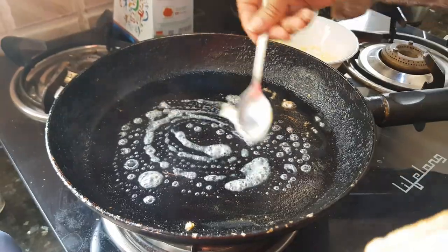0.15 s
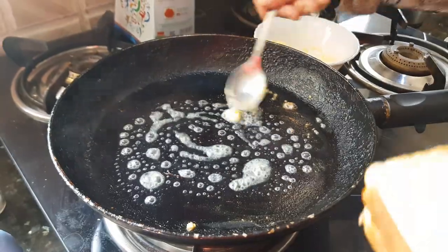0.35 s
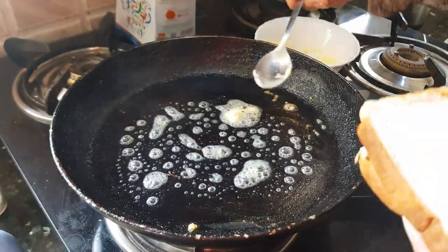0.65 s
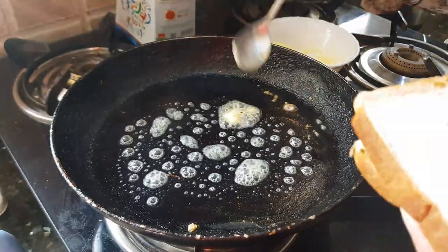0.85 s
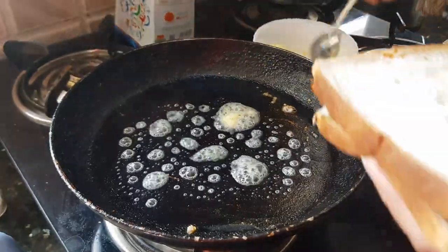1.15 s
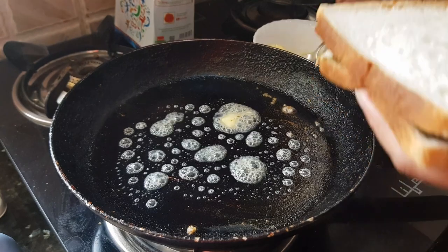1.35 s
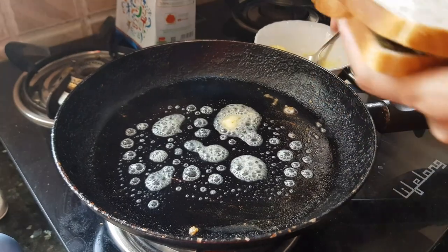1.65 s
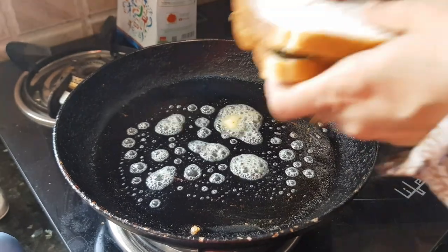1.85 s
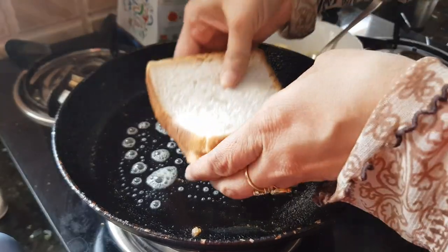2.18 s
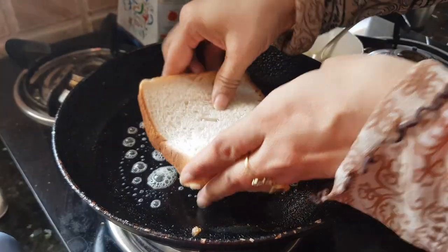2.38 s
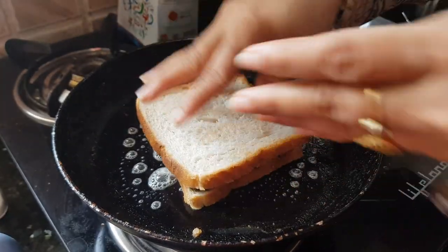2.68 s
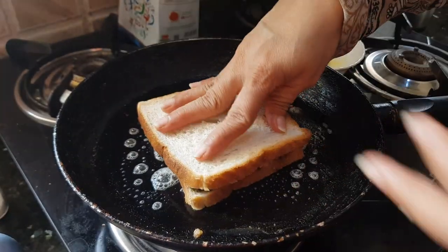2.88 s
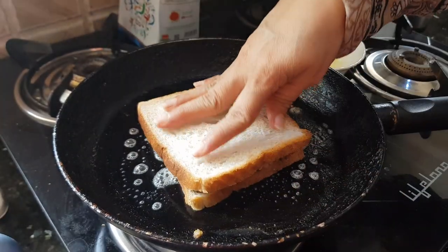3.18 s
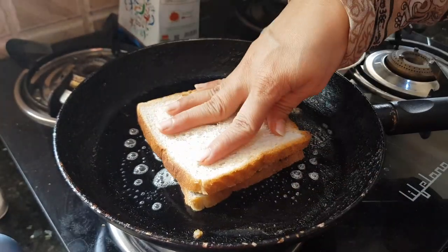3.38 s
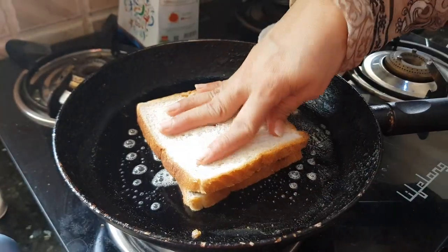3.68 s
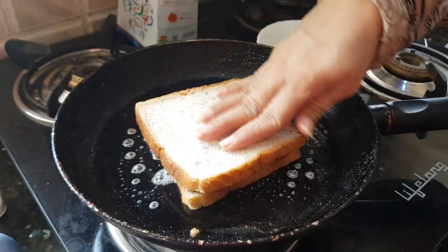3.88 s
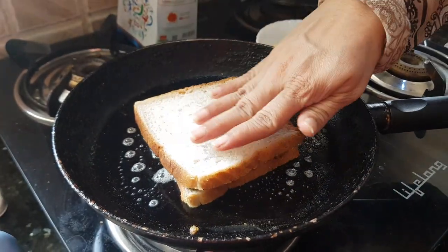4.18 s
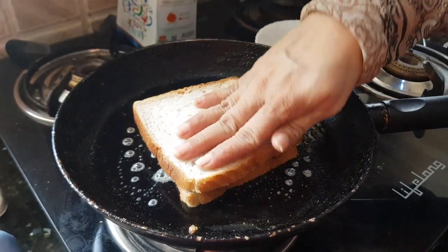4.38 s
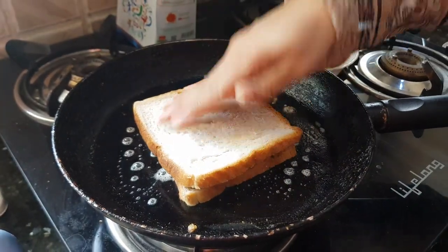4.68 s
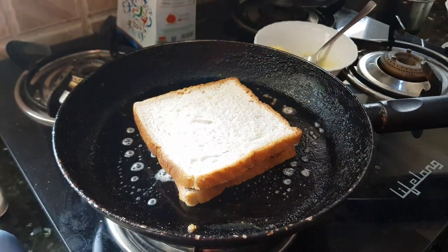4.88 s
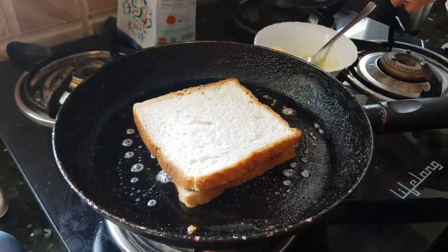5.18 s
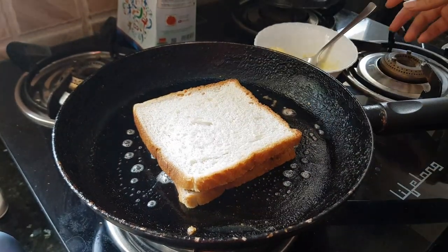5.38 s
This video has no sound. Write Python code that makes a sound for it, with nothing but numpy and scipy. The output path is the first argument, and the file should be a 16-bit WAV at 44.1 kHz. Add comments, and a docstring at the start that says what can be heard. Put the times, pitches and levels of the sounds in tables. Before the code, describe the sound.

A short spoon scrape, lively hot butter sizzle, a ringing spoon drop, then the sizzle drops away under a sandwich, over a low motor hum.

```python
"""A kitchen, at the stove, heard by two microphones with the left one nearer the pan.
Low room noise and a motor's hum lie behind; these are drifting noise and a few wavering harmonics.
A spoon scrapes the pan (clicks into damped modes), thumps, and is dropped into a bowl (ringing modes).
In front, butter sizzles and pops as showers of short rising bursts; a sandwich laid on it muffles the fizz."""
import sys
import numpy as np
from scipy import signal
from scipy.fft import rfft, irfft
from scipy.io import wavfile
from scipy.ndimage import uniform_filter1d

SR = 44100
rng = np.random.default_rng(int(sys.argv[2]) if len(sys.argv) > 2 else 0)


def inscribe(sig):
    """Save sig as 16-bit PCM at rate SR to the path in sys.argv[1].

    A 1-D sig is mono; a 2-D sig holds one channel per row.
    Samples are clipped to [-1, 1] before scaling.
    """
    pcm = np.round(np.clip(np.atleast_2d(sig).T, -1, 1) * 32767)
    wavfile.write(sys.argv[1], SR, pcm.astype(np.int16))


N = 244314
LEAD = 6  # samples by which the left microphone hears the stove first
# midpoint and time scale of a slow shift in pan, pop knock and the background's middle band, after the fizz is
# muffled
SHIFT_S, SHIFT_SPAN_S = 3.8, 0.53


def gain_of(db):
    """Decibels to gain."""
    return 10 ** (np.asarray(db) / 20)


def evened(x):
    """Scales to rms 1."""
    return x / np.sqrt(np.mean(x ** 2) + 1e-20)


def read(points, hz):
    """Reads a spectrum table on a log-frequency axis."""
    f, value = np.transpose(points)
    return np.interp(np.log(hz + 1), np.log(f + 1), value)


def curves(rows):
    """Each column of a time table, sample by sample."""
    s, *columns = np.transpose(rows)
    return [np.interp(np.arange(N) / SR, s, c) for c in columns]


def sides(pan_db):
    """Left and right gain for a level difference; positive leans left."""
    return np.array([gain_of(pan_db / 2), gain_of(-pan_db / 2)])


def add(mix, s, sound):
    """Mixes a two-channel sound in at a time."""
    part = mix[:, round(s * SR):][:, :sound.shape[1]]
    part += sound[:, :part.shape[1]]


def colour(x, spectrum):
    """Flattens each channel's long-term spectrum and imposes the given one."""
    z = rfft(x)
    own = np.sqrt(uniform_filter1d(abs(z) ** 2, size=151) + 1e-12)
    wanted = gain_of(read(spectrum, np.fft.rfftfreq(N, 1 / SR)))
    return evened(irfft(z / own * wanted, N))


def burst(hz, cycles):
    """One bubble: a few cycles that start softly and rise in pitch as it collapses."""
    u = np.arange(256) / SR * hz / cycles
    return u * np.exp(1 - 3 * u) * np.sin(2 * np.pi * cycles * u * (1 + 0.056 * u))


def room(x, t60, wet_db):
    """Pan walls and tiles: a short decaying noise tail, another for each side."""
    t = np.arange(SR // 4) / SR
    tail = rng.standard_normal((2, len(t))) * gain_of(-60 * t / t60) * (t > .002)
    tail = tail / np.linalg.norm(tail[0])
    return x + gain_of(wet_db) * signal.fftconvolve(x, tail, axes=1)[:, :N]


def shifted(s):
    """How far the slow shift has gone, 0 to 1."""
    return .5 + .5 * np.tanh((s - SHIFT_S) / SHIFT_SPAN_S)


# colour of the kitchen's low noise, with its resonances: (f/Hz, relative level/dB per Hz)
RUMBLE = [(35, -12), (60, -5.5), (77, -10.5), (102, -2), (120, -10.5), (143, -5.5), (170, -14.5),
          (203, -10), (235, -22.5), (269, -12.5), (300, -17), (335, -17.5), (417, -23), (735, -24.5),
          (796, -30), (988, -23), (1160, -36), (1500, -26.5), (1950, -45), (3300, -120)]
# likeness of the two microphones: (f/Hz, left-right correlation from 0 to 1)
SAME = [(60, 0.69), (240, 0.67), (950, 0.11), (3770, 0.01), (15000, 0.02)]
RUMBLE_DB, PATCH_DB = -55, 1.2  # level before panning; depth of the drifting patches
# above about 400 Hz the background is quieter and patchier early: level change and extra patch depth, fading
# out around SHIFT_S
EARLY_MID_DB, EARLY_PATCH_DB = -4, 5


def rumble():
    """Low room noise in drifting patches of time and frequency, most alike on both sides in the bass."""
    a, b = rfft(rng.standard_normal((2, N)))
    same = np.clip(read(SAME, np.fft.rfftfreq(N, 1 / SR)), -1, 1)
    pair = irfft([a, same * a + np.sqrt(1 - same ** 2) * b], N)
    z = signal.stft(colour(pair, RUMBLE), nperseg=2048)[2]
    patches = uniform_filter1d(rng.standard_normal(z.shape[1:]), size=3, axis=0)
    patches = uniform_filter1d(patches, size=3, axis=1)
    hz = np.arange(z.shape[1])[:, None] * SR / 2048
    s = np.arange(z.shape[2]) * 1024 / SR
    early = (1 - shifted(s)) * read([(220, 0.035), (420, 1.0)], hz)
    patch_db = (PATCH_DB + EARLY_PATCH_DB * early) * evened(patches)
    patchy = signal.istft(z * gain_of(patch_db + EARLY_MID_DB * early), nperseg=2048)[1][:, :N]
    return gain_of(RUMBLE_DB) * evened(patchy) * sides(1.2)[:, None]


# the motor's hum, before its waver and harmonic balance: (t/s, level/dB)
HUM = [(0.0, -44.5), (1.16, -44), (1.27, -47.5), (1.71, -46.5), (3.44, -46.5), (3.93, -43.5), (5.54, -43.5)]
# harmonics of the motor: (multiple of the hum pitch, level/dB relative to the hum)
HUM_ORDERS = [(1, -2.5), (2, -21), (3, -26), (4, -44), (5, -30)]
HUM_HZ, HUM_DRIFT_HZ, HUM_WAVER_DB = 53.15, 0.26, -0.14  # mean pitch, rms drift, scale of level waver


def hum():
    """Motor orders at multiples of one turning rate; speed and level waver slowly."""
    drift, waver = [evened(uniform_filter1d(v, size=6000)) for v in rng.standard_normal((2, N))]
    turns = np.cumsum(HUM_HZ + HUM_DRIFT_HZ * drift) / SR
    tone = sum(gain_of(db) * np.sin(2 * np.pi * (k * turns + rng.random())) for k, db in HUM_ORDERS)
    level_db = curves(HUM)[0] + HUM_WAVER_DB * uniform_filter1d(waver, size=1500)
    return np.sqrt(2) * gain_of(level_db) * tone * sides(2.8)[:, None]


THUMP_S, THUMP_HZ, THUMP_DB, THUMP_CYCLES = .238, 138, -45, 8.5


def thump():
    """A soft low thump as the spoon leaves the pan: a few cycles that swell and die."""
    u = np.arange(0, 1, THUMP_HZ / THUMP_CYCLES / SR)  # 0 to 1 over the whole thump
    wave = np.sin(np.pi * u ** 0.58) ** 2 * np.sin(2 * np.pi * THUMP_CYCLES * u)
    out = np.zeros((2, N))
    add(out, THUMP_S, gain_of(THUMP_DB) * wave * sides(1.5)[:, None])
    return out


# spoon dragged over the pan: (t/s, level/dB, extra drive of the lowest mode/dB)
SCRAPE = [(0.0, -37, -12), (0.02, -50, 0), (0.05, -48, 2), (0.072, -55, 0), (0.09, -50, -2),
          (0.12, -41, -3), (0.135, -46, -1), (0.148, -43.5, 5), (0.168, -43, -2), (0.19, -44.5, 3),
          (0.225, -54, 12), (0.245, -66, 6), (0.3, -73, 0)]
# low modes of the pan: (f/Hz, bandwidth/Hz, relative level/dB)
PAN = [(565, 15, 14.5), (791, 27, 16.5), (970, 130, 5), (1210, 130, 1), (1334, 31, 12), (1560, 72, -12),
       (1900, 150, -18)]
SLIPS_PER_S, PLACE_DB = 2700, 1  # slips of the spoon; how unevenly its place drives the modes


def scrape():
    """Random stick-slip clicks of the spoon drive the pan's low modes, each a decaying sine."""
    t, length = np.arange(4000) / SR, SR // 2
    body = np.array([gain_of(db) * width * np.exp(-np.pi * width * t) * np.sin(2 * np.pi * hz * t)
                     for hz, width, db in PAN])
    slips = rng.standard_normal(length) * (rng.random(length) < SLIPS_PER_S / SR)
    # the moving tip favours one mode, then another
    place = uniform_filter1d(rng.standard_normal((len(PAN), length)), size=1200)
    level_db, lowest_db = curves(SCRAPE)
    lowest_db = np.outer(np.arange(len(PAN)) == 0, lowest_db[:length])
    drive = slips * gain_of(PLACE_DB * evened(place) + lowest_db)
    rung = signal.oaconvolve(drive, body, axes=1)[:, :length].sum(0)
    highpass = signal.butter(4, 480, "high", fs=SR, output="sos")
    sound = np.pad(evened(signal.sosfilt(highpass, rung)), (0, N - length))
    touching = np.arange(N) / SR < SCRAPE[-1][0]
    return room(sound * gain_of(level_db) * touching * sides(2.4)[:, None], 0.081, -1)


# spoon landing and bouncing in the bowl:
# (t/s, body modes level/dB, low modes level/dB, middle modes level/dB, high modes level/dB)
CLINKS = [(1.203, -22, -15.5, -25.5, -17.5), (1.223, -26.5, -43, -26.5, -43), (1.238, -45, -51, -25.5, -54),
          (1.257, -40, -49, -33.5, -55), (1.274, -26, -50, -31, -33), (1.283, -31, -62, -50, -43),
          (1.2918, -21.5, -30.5, -45, -32), (1.297, -26, -35, -55, -33), (1.304, -26.5, -44, -47, -33),
          (1.312, -31, -50, -44, -47)]
# modes of spoon and bowl, before detuning and touch damping:
# (f/Hz, relative level/dB, decay by 60 dB t60/s, left-right level/dB)
BOWL = [(363, -20, 0.33, 0), (765, -8, 0.024, 2.5), (1076, -13, 0.039, -4), (1304, -5, 0.019, 20),
        (1420, -6.5, 0.07, 15), (1500, -11, 0.079, -7), (1472.5, 5, 0.05, -3), (1672, -15, 0.15, 16),
        (2870, -11, 0.042, -22), (3684, 5, 0.073, 8.5), (3830, -12, 0.06, 11), (6590, -21, 0.041, -22),
        (6587, 4.5, 0.072, 6.5), (6670, -3, 0.08, 9), (6840, -8, 0.06, 3), (9700, -3, 0.078, 12),
        (12350, -8, 0.036, -3), (12880, 2.5, 0.075, 4)]
CLATTER_DB = -7  # noise of a contact, relative to its strongest group of modes
THUD_DB, THUD_HZ = -18, 600  # dull knock of the bowl, relative to its body modes
TOUCH_DB, DETUNE = -4, 0.0019  # each new contact damps what still rings; random relative shift of pitch
CHATTER_DB = 1.9  # the spoon trembles against the bowl, so each mode rings unevenly
RATTLE_CONTACTS, RATTLE_S = 9, 0.0085  # small contacts of the rattle; their mean spacing in seconds
RATTLE_DB, RATTLE_FADE_DB, RATTLE_SPREAD_DB = -34.5, -1.18, 5  # first level, change per contact, random range
RATTLE_RING_DB = -12.5  # level of the other modes, relative to the body modes


def settling_rattle():
    """Dense fading rattle of the spoon in the bowl: small uneven contacts, as rows like the clinks."""
    k = np.arange(RATTLE_CONTACTS)
    when, size = rng.random((RATTLE_CONTACTS, 2)).T
    times = CLINKS[-1][0] + (k + .5 + when / 2) * RATTLE_S
    levels_db = RATTLE_DB + k * RATTLE_FADE_DB + RATTLE_SPREAD_DB * (size - .5)
    return [(s, db, *[db + RATTLE_RING_DB] * 3) for s, db in zip(times, levels_db)]


def clinks():
    """Each contact rings body, low, middle and high modes by its own levels, with a clatter and a thud."""
    out, t = np.zeros((2, N)), np.arange(SR // 4) / SR
    hz, db, t60, pan_db = np.transpose(BOWL)[:, :, None]
    late = t - np.array([[[0]], [[LEAD]]]) / SR  # the right microphone hears it later
    phase = 2 * np.pi * rng.random(hz.shape)
    contacts = CLINKS + settling_rattle()
    times = np.transpose(contacts)[0]
    for s, body_db, low_db, mid_db, high_db in contacts:
        # how many later contacts have touched the ringing bowl so far
        touches = ((times > s) & (s + t[:, None] > times)).sum(1) * 1.
        touches = uniform_filter1d(touches, size=90)
        groups = [(350, low_db), (750, body_db), (1200, body_db), (1400, low_db),
                  (3700, mid_db), (6600, high_db), (10000, high_db + 2.0)]
        chatter = evened(uniform_filter1d(rng.standard_normal((len(hz), len(t))), size=260))
        chatter_db = CHATTER_DB * chatter * np.minimum(t / 0.033, 1)
        mode_db = db + read(groups, hz) + chatter_db - 60 * t / t60 + TOUCH_DB * touches
        seated_hz = hz * (1 + DETUNE * rng.standard_normal(hz.shape))  # it seats a little differently
        wave = np.sin(2 * np.pi * seated_hz * late + phase + 2 * np.pi * hz * s)
        ring = (sides(pan_db) * gain_of(mode_db) * wave).sum(1)
        clatter = signal.lfilter([1], [1, -.6], rng.standard_normal((2, len(t)))) * np.exp(-t / 0.013)
        clatter = signal.lfilter([1, -1], [1, -.95], clatter)  # takes out the bass
        clatter = gain_of(max(body_db, low_db, mid_db, high_db) + CLATTER_DB) * clatter
        thud = gain_of(body_db + THUD_DB) * np.pad(burst(THUD_HZ, 0.97), (0, len(t) - 256))
        add(out, s, (ring + clatter + thud) * np.minimum(t / 0.00077, 1))
    return room(out, 0.38, -9.5)


SMALL_POPS, SMALL_DB, SMALL_SPREAD_DB = 24, -37.5, 6  # count, mean level, random range
SMALL_LOW_HZ, SMALL_HIGH_HZ, SMALL_PAN_DB = 2200, 13000, 6.5  # pitch range, mean lean to the left


def small_pops():
    """Faint pops of chance pitch and place, one in each equal slot from SHIFT_S to the end."""
    when, size, pitch, side = rng.random((SMALL_POPS, 4)).T
    s = SHIFT_S + (N / SR - SHIFT_S) * (np.arange(SMALL_POPS) + when) / SMALL_POPS
    level_db = SMALL_DB + SMALL_SPREAD_DB * (size - .5)
    hz = SMALL_LOW_HZ * (SMALL_HIGH_HZ / SMALL_LOW_HZ) ** np.sqrt(pitch)  # leans to the high end
    return list(zip(s, level_db, hz, 2 * SMALL_PAN_DB * side))


# single bursts of steam at set times, loud and soft: (t/s, level/dB, starting pitch f/Hz, left-right level/dB)
POPS = [(0.4054, -24, 14600, 9), (0.427, -11.5, 12300, 7), (0.483, -16, 10700, 2), (0.498, -15, 11800, 13),
        (0.511, -14, 11000, 7), (0.7425, -23, 11000, 7), (0.8246, -16.5, 10600, 8), (1.0338, -12, 6460, 11),
        (1.0935, -12.5, 10100, 13), (1.147, -12.5, 10100, 8), (1.1845, -25, 12700, 8),
        (1.378, -22, 10000, 7), (1.413, -16.5, 11000, 15), (1.478, -18, 12700, 11), (1.618, -12, 11000, 5),
        (1.643, -10.5, 11200, 13), (2.077, -21.5, 11820, 9), (2.088, -17, 9920, 3),
        (2.235, -21.5, 9050, 10), (2.304, -22, 12300, 10), (2.44, -28.5, 1340, 6), (2.44, -23, 10300, 10),
        (2.5172, -24, 11600, 8), (2.562, -21.5, 10800, 4), (2.752, -51, 1530, 4.5), (2.772, -35, 1640, 3.5),
        (2.856, -26.5, 2380, 4), (2.879, -27, 3100, 3), (2.913, -32, 5900, 7), (2.938, -23, 1900, 5),
        (2.981, -34, 7500, 0), (3.1165, -34, 6280, 10), (3.324, -30.5, 1600, 5), (3.325, -32, 9600, 3),
        (3.378, -38, 12000, 3), (3.435, -30, 1410, 7), (3.484, -30, 2760, 4.5), (3.642, -36, 1520, 3.5),
        (3.6598, -32.5, 4950, 4.5), (3.7405, -26, 4780, 10), (3.7476, -23.5, 10400, 5),
        (3.748, -29, 1900, 4), (3.851, -36, 1500, 5), (3.9067, -26, 12000, 1), (4.008, -28, 12500, 5),
        (4.0153, -24, 10830, 1), (4.0702, -28, 14480, 1), (4.1262, -28, 13500, 2), (4.1715, -33, 11050, 8),
        (4.2006, -35, 14200, 1), (4.6056, -32, 6500, 10), (4.695, -37, 1350, 5.5),
        (4.8323, -32.5, 10900, 3), (5.026, -32.5, 10600, 3), (5.027, -40, 5700, 5), (5.1997, -34, 11100, 2),
        (5.2906, -36, 1420, 6), (5.293, -33, 5900, 10), (5.424, -36, 1540, 12), (5.511, -32, 11250, 12)]
EARLY_KNOCK_DB, LATE_KNOCK_DB = -51, -12  # knock on the pan, relative to its pop, before and after the shift


def pops():
    """Each pop is a pitched burst, a wider tick of noise and a dull knock on the pan."""
    out, t, rows = np.zeros((2, N)), np.arange(256) / SR, POPS + small_pops()
    for s, db, hz, pan_db in rows:
        noise = rng.standard_normal((2, 257))
        bright = noise[:, 1:] - noise[:, :-1] * 0.95
        tick = 0.29 * (hz / 10000) ** 0.8 * bright * t / 0.0005 * np.exp(1 - t / 0.00037)
        cycles = 3.4 * hz / 10000  # big bubbles ring fewer cycles
        knock_db = EARLY_KNOCK_DB + (LATE_KNOCK_DB - EARLY_KNOCK_DB) * shifted(s)
        pop = burst(hz, cycles) + tick + gain_of(knock_db) * burst(810, 0.34)
        add(out, s, gain_of(db) * sides(pan_db)[:, None] * pop)
    return room(out, 0.05, -7)


def bubbles(low_hz, high_hz, per_s, spread_db, cycles, clump_db, hiss):
    """Bursts of many sizes all over the pan, in clumps; each spot reaches the two sides at its own time."""
    clumps = gain_of(clump_db * evened(uniform_filter1d(rng.standard_normal(N), size=900)))
    bursting = rng.random(N) < per_s / SR
    # a few bubbles snap far louder than the rest
    size = gain_of(spread_db * np.minimum(rng.exponential(1, N), 5)) * bursting
    spot, out = rng.integers(0, 24, N), np.zeros((2, N))
    for k, hz in enumerate(np.geomspace(low_hz, high_hz, num=24)):
        left = signal.oaconvolve(size * clumps * (spot == k), burst(hz, cycles))[:N]
        right = np.roll(left, LEAD + rng.integers(-12, 12)) * rng.uniform(1.0, 2.7)
        out += [left, right]
    return evened(out) + hiss * clumps * rng.standard_normal((2, N))


# bubbles bursting, before panning and swells: (t/s, fine fizz level/dB, coarse sputter level/dB)
SIZZLE = [(0.0, -31, -42.5), (0.31, -30, -50), (0.72, -32, -54.5), (1.15, -34, -52), (1.45, -35.5, -52.5),
          (1.68, -36, -58), (1.9, -35.5, -57), (2.04, -37, -61), (2.1, -40, -61), (2.2, -43, -57),
          (2.27, -43, -53), (2.42, -50, -52), (2.58, -50.5, -53.5), (2.83, -63, -54), (3.01, -59, -52),
          (3.32, -61.5, -56.5), (3.64, -62, -54), (3.95, -56, -57), (4.31, -57, -60.5), (4.59, -59, -57.5),
          (4.84, -56.5, -60.5), (5.22, -59, -63), (5.54, -61.5, -61.5)]
# colour of the fine fizz: (f/Hz, relative level/dB per Hz)
FIZZ = [(880, -54), (1500, -67), (1660, -24), (1850, -33), (2340, -18.5), (3090, -18.5), (3880, -12.5),
        (6310, -5.5), (7920, -11), (11100, 0.5), (14500, -2.5), (15200, -4.5), (16000, -3.5)]
# colour of the coarse sputter: (f/Hz, relative level/dB per Hz)
SPUTTER = [(150, -44), (350, -24), (700, -7.5), (1150, -4), (1420, -1.5), (2000, -1.5), (3500, -5),
           (4500, -2.5), (5200, -6.5), (6300, -4.5), (7900, -13), (9000, -9.5), (12000, -5), (16000, -14)]
# butter bubbling in the hollow under the bread: (f/Hz, relative level/dB per Hz)
GURGLE = [(500, -35), (950, -15), (1400, 5), (1750, -11.5), (2600, -27), (5000, -60)]
# swells under the bread: (centre t/s, change of sputter level/dB, gurgle level/dB)
PRESSES = [(2.452, -0.5, -62), (2.9, 0, -68), (3.46, -3, -62), (3.58, 2.5, -62), (4.04, 4, -77),
           (4.095, 5.5, -65), (4.52, -1.5, -63), (4.62, 3.5, -80), (4.695, 2.5, -66), (5.33, 3.5, -69),
           (5.385, 2, -79), (5.44, 1.5, -65)]
PRESS_S = 0.031  # time scale of each swell
EARLY_PAN_DB, LATE_PAN_DB = 8, 1.5  # lean of the fizz to the left, before and after the shift


def sizzle():
    """Fine fizz from the open butter over coarser sputter, which swells when bread is squeezed or settles."""
    t = np.arange(N) / SR
    fizz_db, sputter_db = curves(SIZZLE)
    pan_db = EARLY_PAN_DB + (LATE_PAN_DB - EARLY_PAN_DB) * shifted(t)
    swell_db = sum(db * np.exp(-((t - s) / PRESS_S) ** 2) for s, db, _ in PRESSES)
    gurgle_gain = sum(gain_of(db) * np.exp(-.5 * ((t - s) / PRESS_S) ** 2) for s, _, db in PRESSES)

    gurgle = bubbles(870, 2100, per_s=500, spread_db=2.5, cycles=3.6, clump_db=1.0, hiss=0.6)
    gurgle = colour(gurgle, GURGLE) * gurgle_gain * sides(5.1)[:, None]
    fizz = bubbles(2540, 18000, per_s=4600, spread_db=3.3, cycles=2.03, clump_db=1.38, hiss=0.56)
    fizz = colour(room(fizz, 0.055, -1.5), FIZZ) * gain_of(fizz_db) * sides(pan_db)
    sputter = bubbles(638, 6200, per_s=2500, spread_db=2.5, cycles=1.17, clump_db=1.5, hiss=1.0)
    sputter = colour(room(sputter, 0.066, 0.58), SPUTTER)
    sputter = sputter * gain_of(sputter_db + swell_db) * sides(5.2)[:, None]
    return fizz + gurgle + sputter


def scene():
    """All sources at the two microphones, from the room to the pan."""
    return rumble() + hum() + thump() + scrape() + clinks() + pops() + sizzle()


CEILING, EDGE_HZ = .75, 15900  # peak the input saturates toward; upper edge of the band


def record(dry):
    """The microphone input saturates softly, then a lowpass limits the band."""
    soft = CEILING * np.tanh(dry / CEILING)
    lowpass = signal.firwin(511, EDGE_HZ, window=("kaiser", 9), fs=SR)
    return signal.oaconvolve(soft, lowpass[None], "same")


dry = scene()
out = record(dry)
inscribe(out)
```